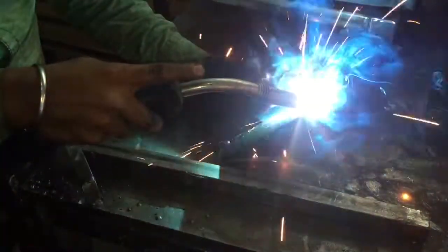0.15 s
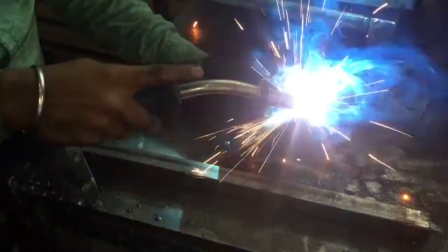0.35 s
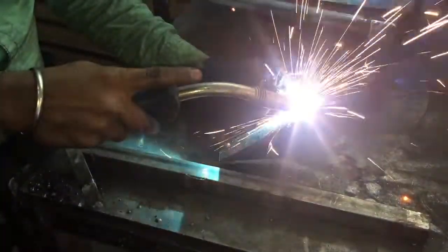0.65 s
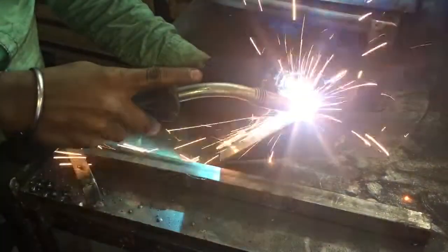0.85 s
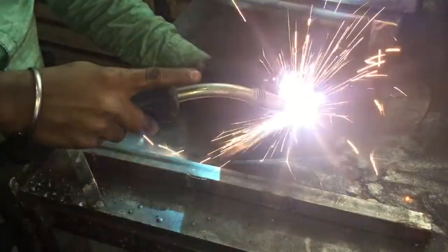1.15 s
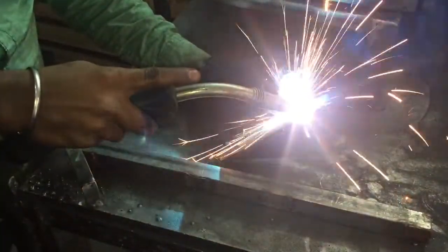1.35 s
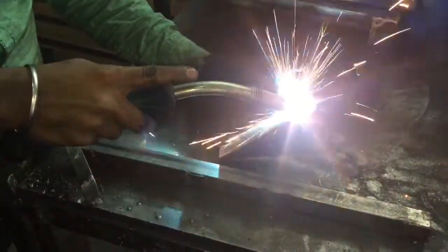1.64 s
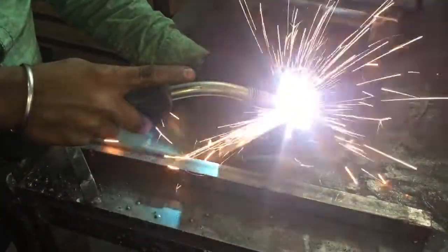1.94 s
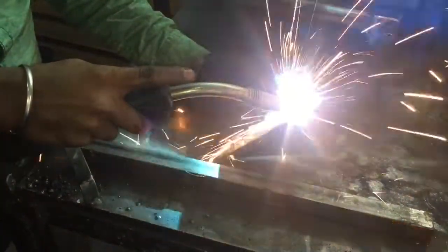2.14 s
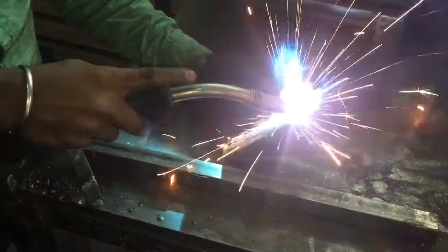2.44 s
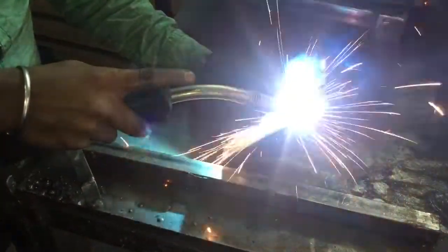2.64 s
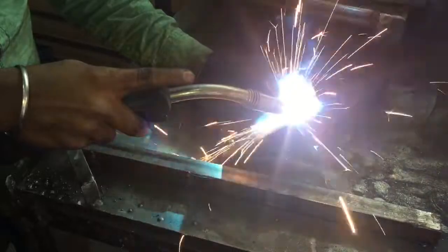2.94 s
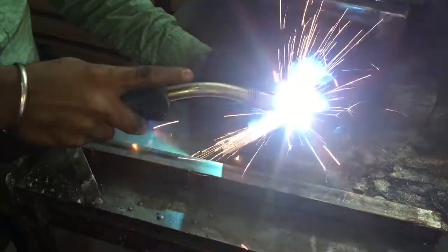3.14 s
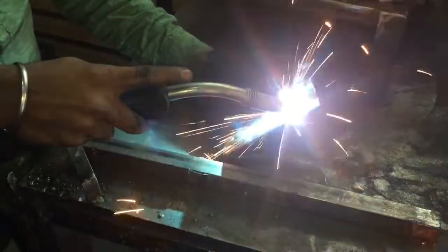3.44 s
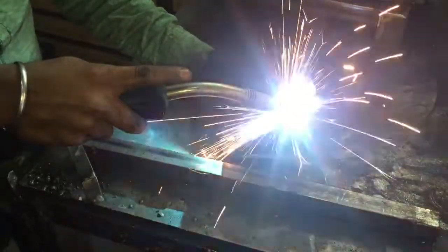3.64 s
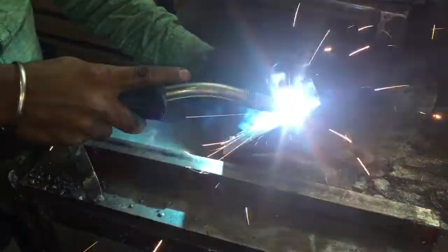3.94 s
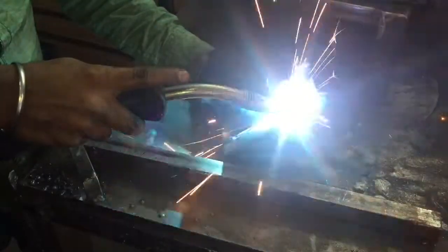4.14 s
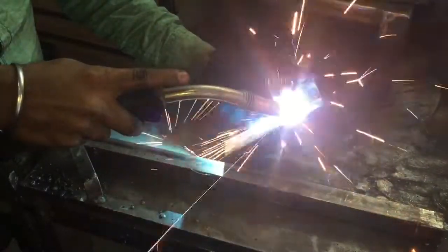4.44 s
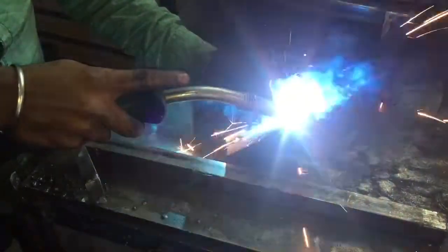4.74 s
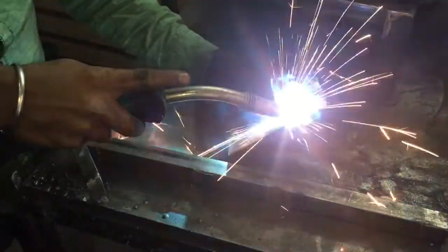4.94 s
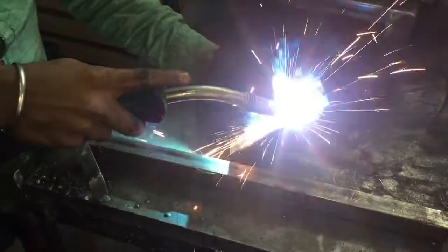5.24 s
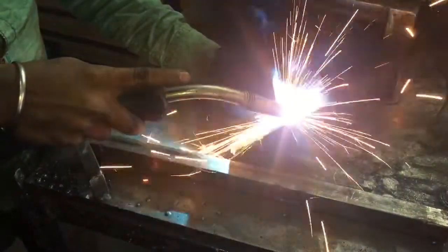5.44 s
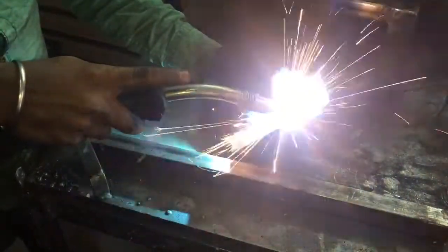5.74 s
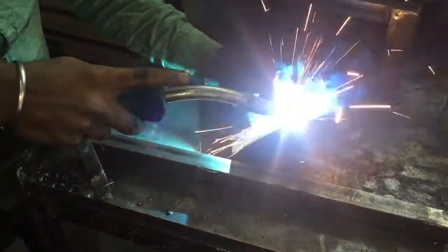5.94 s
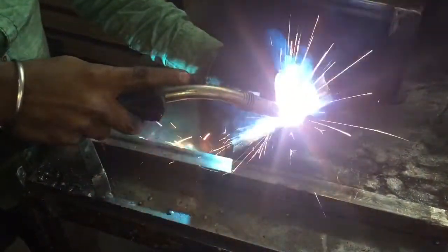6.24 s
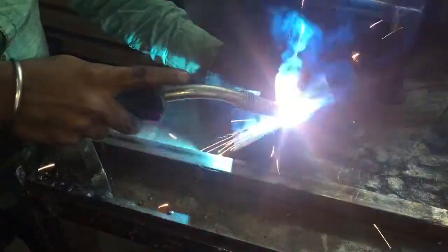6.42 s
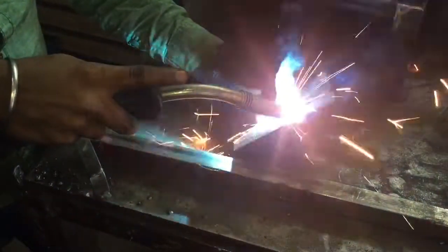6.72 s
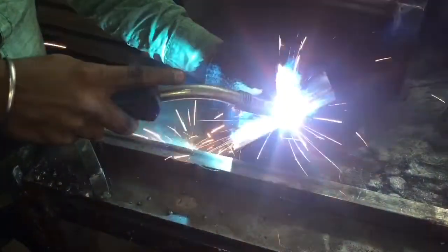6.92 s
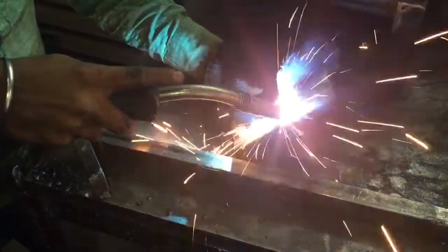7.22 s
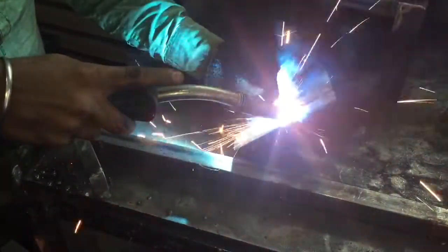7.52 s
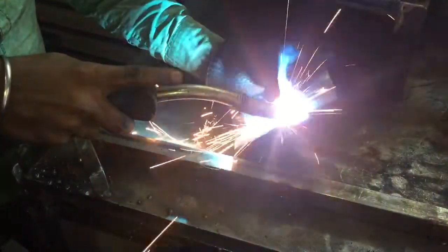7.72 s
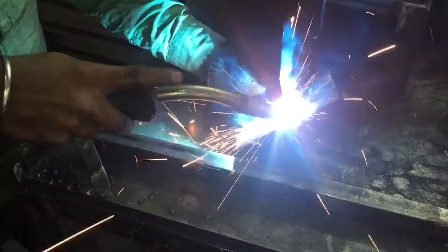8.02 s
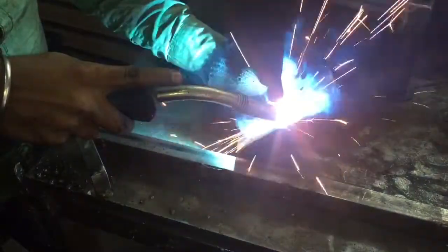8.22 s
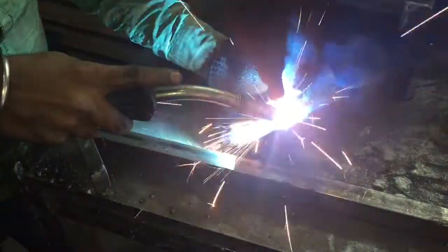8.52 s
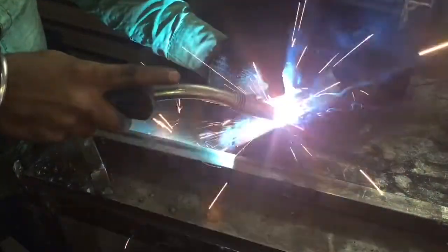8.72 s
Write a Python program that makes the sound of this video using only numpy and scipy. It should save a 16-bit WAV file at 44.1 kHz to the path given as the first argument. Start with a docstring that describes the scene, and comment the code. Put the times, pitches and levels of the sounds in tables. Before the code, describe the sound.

Close, harsh welding sizzle buzzes unevenly over rumbling steel, broken by clusters of deep distorted thumps and bright metallic spatter cracks.

```python
"""A ragged, sizzling crackle, some 120 short circuits a second, with louder spits and heavy thumps.
A wire-feed welding torch runs a seam on steel in a workshop, an arm's length from a phone's microphone.
Each short is a pair of noise bursts over a sizzle of fine spatter; the corner of the workpiece colours it,
the steel rumbles and a low hum wavers beneath. Jolts of the stumbling arc thump the microphone into
overload, and the crackle sags for a moment after each volley."""
import sys
import numpy as np
from scipy import signal
from scipy.fft import rfft, irfft, next_fast_len
from scipy.io import wavfile
from scipy.ndimage import uniform_filter1d

SR = 44100
rng = np.random.default_rng(int(sys.argv[2]) if len(sys.argv) > 2 else 0)


def transcribe(u):
    """Save the signal u as a 16-bit wav file named by the first command-line argument.

    u: samples, shape (n,) or (channels, n), limited to [-1, 1]; the rate is SR.
    q: integer samples, one column per channel.
    """
    v = np.clip(np.atleast_2d(u).T, -1, 1)
    q = np.round(v * 32767).astype(np.int16)
    wavfile.write(sys.argv[1], SR, q)


N = 391166

# how strongly the arc burns while nothing upsets it: (time [s], relative level [dB])
ARC_STRENGTH = [(0.0, -29.5), (0.69, -24), (1.15, -25), (1.58, -29.5), (1.83, -24.5), (2.38, -23.5),
                (2.59, -27), (3.17, -27.0), (3.44, -28.5), (3.71, -26), (4.21, -27), (4.71, -23),
                (4.92, -31.5), (5.06, -24), (5.86, -21.5), (7.49, -27.5), (7.8, -23.5), (8.87, -23.5)]
# brief dips of the arc: (time at the deepest [s], half length [s])
ARC_DIPS = [(0.277, 0.024), (3.429, 0.029), (3.889, 0.0052), (3.974, 0.024), (4.213, 0.024),
            (4.797, 0.0081), (5.374, 0.016), (7.034, 0.04), (7.334, .03), (7.615, 0.027), (8.107, 0.018)]
# low wavering hum: (time [s], pitch [Hz], level against the crackle before the mix [dB])
HUM_TRACK = [(0, 162.4, -23.5), (4.3, 157, -24), (4.65, 181, -12), (5.0, 174.8, -20), (5.25, 158.4, -10.5),
             (5.6, 172.2, -12), (5.85, 141, -11), (6.2, 149.5, -9), (7.7, 150, -22.5), (8.45, 175.6, -7.5),
             (8.65, 210.6, -8)]
# loud jolts of the stumbling arc: (time [s], signed relative height of the step [-])
JOLT_STEPS = [(0.0793, 1.86), (0.1335, -2.44), (0.1612, 1.13), (0.1816, 0.61), (0.2116, -0.85),
              (0.2163, -2.21), (0.2391, 0.68), (0.5187, -0.3), (0.7443, 3.18), (0.7546, -5.3), (0.784, 0.5),
              (0.8756, -0.85), (1.0548, 1.04), (1.1136, -1.16), (1.1358, -0.65), (1.2199, 0.79),
              (1.2544, 6.53), (1.2738, -2.1), (1.2905, 2.29), (1.4548, -0.27), (1.8107, 2.61),
              (1.834, -1.92), (1.8803, 2.8), (1.8925, -2.08), (1.9442, -0.98), (1.9743, 1.27),
              (2.0221, -0.49), (2.3632, 3.11), (2.3857, -3.4), (2.4009, 4.42), (2.4075, -1.25),
              (2.4212, -3.01), (2.4653, 1.77), (2.4841, -1.03), (2.5897, 2.92), (2.6139, -0.74),
              (2.6913, 2.31), (2.7003, -1.21), (2.7107, -1.81), (3.0982, -2.39), (3.1206, 0.91),
              (3.1349, 1.2), (3.1749, -3.04), (3.192, 2.75), (3.2993, -3.02), (3.3211, 1.39),
              (3.3677, -0.45), (3.9036, 4.09), (3.9241, -1.2), (3.928, -3.71), (3.9452, 2.22),
              (3.9568, 1.09), (3.9936, -0.61), (4.0064, -3.24), (4.0415, 0.37), (4.231, -1.25),
              (4.2959, 0.33), (4.8127, 5.91), (4.8161, 1.12), (6.018, 3.8), (6.0637, -2.93),
              (6.0712, -4.68), (6.0996, 0.9), (6.2061, 1.83), (6.2229, -0.81), (6.2649, -0.82),
              (6.3135, -1.32), (6.3937, 1.31), (6.4166, 4.02), (6.5207, -1.71), (6.5682, 0.89),
              (6.6381, 4.85), (6.6681, -0.73), (6.7999, 4.95), (6.8272, -0.92), (6.8782, 2.43),
              (6.9022, -2.69), (6.9368, 1.15), (6.9845, -1.08), (7.209, 4.37), (7.2174, -1.53),
              (7.2215, -2.04), (7.3938, 0.73), (7.4317, -0.9), (7.5694, 0.4), (7.8244, -0.82),
              (7.886, 1.76), (7.9549, -1.22), (7.9569, -3.25), (7.9851, 2.02), (8.0285, 1.03),
              (8.0659, -0.45), (8.152, -0.5), (8.763, 7.34), (8.7663, 2.39), (8.7747, -4.53),
              (8.8243, -2.6), (8.8475, 1.26), (8.8601, 1.1)]
# loudest spits of bursting metal: (time [s], level before the mix [dB])
LOUD_SPITS = [(2.336, -16), (2.351, -15), (3.0937, -9), (3.5952, -13.5), (3.6814, -8.5), (3.8542, -7),
              (3.8625, -8), (4.733, -11), (5.032, -4.5), (5.2652, -9), (5.3845, -6.5), (5.414, -3),
              (5.4723, -19), (5.7676, 0), (5.7955, -5.5), (6.306, 1), (7.1744, -10.5), (7.659, -15),
              (7.7333, -8), (7.8123, -10), (8.3619, -6), (8.4031, -1), (8.4336, -4.5), (8.514, -2),
              (8.5741, -1.5), (8.6225, -3)]
# standing waves between torch and steel, which swell and wane as the torch moves along the joint:
# (centre [Hz], width [Hz], strongest level [dB], time when strongest [s], depth of wane [dB],
#  swell to swell [s])
CORNER_WAVES = [(663, 312, 2.5, 8.2, 2, 14.4), (1410, 770, 1.4, 7.5, 4.5, 15),
                (2300, 640, 1.4, 5.9, 4.5, 8.4), (3224, 950, 3.5, 7.3, 4.5, 17.5),
                (3680, 344, 8.5, 5.2, 3.5, 11), (4260, 260, -3, 5.1, 4.5, 4.9),
                (5337, 670, 4, 1.6, 11, 3.2), (6034, 520, 9, 5.73, 11.5, 13.5),
                (7370, 1300, -0.5, 6.53, 9, 7.2), (8570, 830, 8, 1.35, 9, 9.2),
                (9340, 810, 5.5, 4.04, 6, 6), (11600, 1100, 5, 2.2, 17.5, 13.5),
                (11780, 1100, 6, 7.5, 36, 15.5), (14340, 2500, 5.5, 6.7, 1.5, 9.1),
                (14800, 1200, -2, 2.5, 28, 7.5), (15300, 930, -14, 0.2, 10, 2.1)]
# where the phone's sound path turns the phase: (frequency [Hz])
PHASE_TURNS_HZ = [57, 501, 6440]

DIP_DB = -6.5  # at the bottom of a dip
# a jolt knocks the arc back: loss per unit of jolt height, time to falter, time to recover
LOSS_DB, FALTER_S, RECOVER_S = 0.63, .015, .24
SHORT_RATE, SHORT_SPREAD = 120, .36  # short circuits a second; log spread of their spacing
SPATTER_RATE = 900  # fine droplets a second
# kicks after jolts: chance for each jolt, typical delay, typical height after a jolt of 1 or more
KICK_CHANCE, KICK_DELAY_S, KICK_HEIGHT = .4, .016, 0.24
# lesser spits: how many a second, weakest level against the arc before the mix, range above it
SPIT_RATE, SPIT_WEAKEST_DB, SPIT_RANGE_DB = 5.6, 12, 6
TOP_HZ = 15900  # upper limit of the phone


def undb(db):
    """Decibels to gain."""
    return 10 ** (np.asarray(db) / 20)


def curve(rows):
    """A control joined by straight lines, one value a sample."""
    return np.interp(np.arange(N) / SR, *np.transpose(rows))


def impulses(times, sizes):
    """One spike of the given size at each time."""
    at = np.round(times * SR).astype(int)
    inside = (at >= 0) & (at < N)
    return np.bincount(at[inside], sizes[inside], N)


def fade(x, decay_s):
    """Every spike of x dies away exponentially."""
    return signal.lfilter([1], [1, -np.exp(-1 / (decay_s * SR))], x + 1e-18)


def filtered(x, response):
    """Pass x through a response given as a function of s = j Hz."""
    size = next_fast_len(N + SR, real=True)
    s = 1j * np.arange(size // 2 + 1) * SR / size
    return irfft(rfft(x, size) * response(s), size)[:N]


def ring(x, hz, width_hz):
    """One resonance, gain 1 at its centre."""
    return filtered(x, lambda s: width_hz * s / (s ** 2 + width_hz * s + hz ** 2))


def steady(x, span_s):
    """Bring the running rms of x to 1."""
    return x / np.sqrt(uniform_filter1d(x ** 2, int(span_s * SR)) + 1e-12)


def bursts(times, sizes, decay_s, tail_s, tail_db, click_db):
    """Tiny explosions: a click, a puff of noise, and a weaker fizz with its own decay."""
    power = impulses(times, sizes ** 2)
    puff = fade(power, decay_s / 2)  # power dies twice as fast as amplitude
    fizz = undb(tail_db) ** 2 * fade(power, tail_s / 2)
    envelope = np.sqrt(puff + fizz)
    # at 0 dB the click is as strong as its puff
    click = undb(click_db) * np.sqrt(decay_s * SR / 2) * impulses(times, sizes)
    return click + envelope * rng.standard_normal(N)


def burn_db():
    """Strength of the arc: each jolt unsettles it, so it sags after a volley and then builds up again."""
    times, heights = np.transpose(JOLT_STEPS)
    t = np.arange(N) / SR
    since_jolt = t - np.r_[0, times][np.searchsorted(times, t)]
    upset = fade(impulses(times, np.abs(heights)), RECOVER_S)
    sag = LOSS_DB * upset * (1 - np.exp(-since_jolt / FALTER_S))
    dips = sum(np.exp(-((t - s) / half_s) ** 2) for s, half_s in ARC_DIPS)
    return curve(ARC_STRENGTH) - sag + DIP_DB * dips


def waver(depth_db, hz, width_hz):
    """The arc never burns quite evenly: its strength flutters at a loose rate."""
    flutter = ring(rng.standard_normal(N), hz, width_hz)
    return undb(depth_db * flutter / flutter.std())


def shorts(heat_db, scatter_db, length_s, stretch, count=2):
    """The wire touches the pool and blows free again: two quick cracks, uneven in spacing and force."""
    chance = rng.standard_normal((int(2 * SHORT_RATE * N / SR), 3 + count))
    spacings = np.exp(SHORT_SPREAD * chance[:, 0] - SHORT_SPREAD ** 2 / 2) / SHORT_RATE
    starts = np.cumsum(spacings)
    # a hotter arc takes longer to blow free
    relative_heat_db = np.interp(starts, np.arange(N) / SR, heat_db - heat_db.mean())
    lengths = length_s * undb(stretch * relative_heat_db) * np.exp(.7 * chance[:, 1])
    times = starts[:, None] + lengths[:, None] * np.linspace(0, 1, count)
    short_db = scatter_db * np.minimum(chance[:, 2:3], 1.6)
    crack_db = 3.2 * np.minimum(chance[:, 3:], 1.3)
    sizes = undb(short_db + crack_db)
    cracks = bursts(times.ravel(), sizes.ravel(), decay_s=.0005, tail_s=.003, tail_db=-14, click_db=0)
    return steady(cracks, span_s=0.098)


def spatter(scatter_db):
    """Fine droplets sizzle among the snaps, each a tiny burst at a random time."""
    count = int(SPATTER_RATE * N / SR)
    times = rng.uniform(0, N / SR, count)
    sizes = undb(scatter_db * rng.standard_normal(count))
    sizzle = bursts(times, sizes, decay_s=0.0012, tail_s=0.0011, tail_db=-10.0, click_db=-10)
    return steady(sizzle, span_s=0.62)


def hum(flutter_s):
    """A low tone that wanders in pitch and flutters in strength."""
    s, hz, db = np.transpose(HUM_TRACK)
    phase = 2 * np.pi * np.cumsum(curve(np.c_[s, hz])) / SR
    flutter = fade(fade(rng.standard_normal((2, N)), flutter_s), flutter_s)
    tone = flutter[0] * np.cos(phase) + flutter[1] * np.sin(phase)
    return undb(curve(np.c_[s, db])) * steady(tone, span_s=0.12)


def steel(crackle):
    """The crackle shakes the steel: a dull rumble and one narrow note, stronger when the hum is."""
    evenness = undb(curve(np.array(HUM_TRACK)[:, ::2]) / 2)  # half the hum's swing in dB
    rumble = undb(6.0) * ring(crackle, hz=176, width_hz=385)
    note = undb(15.5) * ring(crackle, hz=345, width_hz=4.5)
    return evenness * (rumble + note)


def tremors(rate):
    """Tiny jolts of either sign come at random times, rate of them a second."""
    count = int(rate * N / SR)
    return impulses(rng.uniform(0, N / SR, count), rng.laplace(size=count))


def jolts():
    """Times and heights of the loud jolts and of the weaker kicks that trail some of them."""
    times, heights = np.transpose(JOLT_STEPS)
    luck, delay, size, sign = rng.uniform(size=(len(times), 4)).T
    kick_times = times + KICK_DELAY_S * 2 ** (2 * delay - 1)
    kick_sizes = KICK_HEIGHT * np.minimum(np.abs(heights), 1) * (.5 + size)
    kicks = (luck < KICK_CHANCE) * kick_sizes * np.sign(sign - .5)
    return np.r_[times, kick_times], np.r_[heights, kicks]


def thumps(steps, leak_hz, low_cut_hz, damping):
    """Each jolt is a step at the microphone. It leaks away, and its lows come late: a falling 'tew'."""
    def response(s):
        step = SR / (2 * np.pi) / (s + leak_hz)
        cuts = [s ** 2 / (s ** 2 + damping * hz * s + hz ** 2) for hz in low_cut_hz]
        # all-pass: turns the phase, keeps the level
        turns = [(s ** 2 - np.sqrt(2) * hz * s + hz ** 2) / (s ** 2 + np.sqrt(2) * hz * s + hz ** 2)
                 for hz in PHASE_TURNS_HZ]
        return step * np.prod(cuts + turns, axis=0)
    return filtered(steps, response)


def spits(burn, jolt_times, jolt_heights, jolt_db):
    """Larger drops burst with a crack, the lesser ones by chance and with the arc; jolts crack too."""
    loud_times, loud_db = np.transpose(LOUD_SPITS)
    place, force = rng.uniform(size=(int(SPIT_RATE * N / SR), 2)).T
    lesser = burn[(place * N).astype(int)] * undb(SPIT_WEAKEST_DB + SPIT_RANGE_DB * force)
    jolt_sizes = undb(jolt_db) * np.minimum(np.abs(jolt_heights), 1)
    times = np.r_[loud_times, place * N / SR, jolt_times]
    sizes = np.r_[undb(loud_db), lesser, jolt_sizes]
    return bursts(times, sizes, decay_s=0.00046, tail_s=0.0011, tail_db=-12.5, click_db=-8)


def corner_response(s, valley_db, size=1024):
    """Causal ring of the corner with the torch where it is at time s."""
    hz = np.arange(size // 2 + 1) * SR / size
    centre, width, db, strongest_s, wane_db, period_s = np.transpose(CORNER_WAVES)[:, :, None]
    peaks = undb(db - wane_db * np.sin(np.pi * (s - strongest_s) / period_s) ** 2)
    resonances = peaks / (1 + (2 * (hz - centre) / width) ** 2)
    power = undb(valley_db) ** 2 + np.sum(resonances ** 2, axis=0)
    # fold the cepstrum forward in time: minimum phase
    cepstrum = irfft(np.log(power) / 2)
    cepstrum[1:size // 2] *= 2
    cepstrum[size // 2 + 1:] = 0
    return irfft(np.exp(rfft(cepstrum)))


def corner(x, count=12):
    """Standing waves in the corner colour x, gliding from one place on the joint to the next."""
    places = np.linspace(0, N / SR, count)
    coloured = np.zeros(N)
    for s, weight in zip(places, np.eye(count)):
        share = curve(np.c_[places, weight])  # crossfade between neighbouring places
        coloured += signal.oaconvolve(x * share, corner_response(s, valley_db=-42.0))[:N]
    return coloured


def workshop(x, t60_s, wet_db):
    """A faint tail of decaying noise from the bench and the walls."""
    t = np.arange(SR // 2) / SR
    tail = rng.standard_normal(len(t)) * np.exp(-np.log(1000) * t / t60_s) * (t > .003)
    return x + undb(wet_db) * signal.oaconvolve(x, tail / np.linalg.norm(tail))[:N]


def scene():
    """Crackle and spits ring in corner and room, crackle in the steel; jolts strike the microphone directly."""
    heat_db = burn_db()
    burn = undb(heat_db) * waver(depth_db=1.65, hz=61.5, width_hz=20)
    jolt_times, jolt_heights = jolts()

    snaps = undb(4.0) * shorts(heat_db, scatter_db=1.17, length_s=.0006, stretch=.9)
    sizzle = undb(-2.5) * spatter(scatter_db=4.5)
    crackle = burn * (snaps + sizzle)
    cracks = undb(6.5) * spits(burn, jolt_times, jolt_heights, jolt_db=-15.5)
    arc = corner(crackle + cracks) + steel(crackle) + undb(-1) * burn * hum(flutter_s=0.007)
    # the small microphone drops the deep bass of the arc
    arc = signal.sosfilt(signal.butter(2, 70, "high", fs=SR, output="sos"), arc)

    big_steps = undb(-0.76) * impulses(jolt_times, jolt_heights)
    tiny_steps = undb(-7.5) * burn * tremors(rate=45)
    pops = thumps(big_steps + tiny_steps, leak_hz=54, low_cut_hz=[58, 35], damping=1.27)
    pops = pops + undb(-12) * ring(pops, hz=620, width_hz=250)  # a slight honk in the middle
    return (workshop(arc, t60_s=0.12, wet_db=-11.0) + pops)[None]


def record(dry):
    """The phone flattens everything near full scale and cuts the top."""
    squashed = dry / (1 + dry ** 4) ** (1 / 4)
    return signal.sosfilt(signal.ellip(10, .1, 70, TOP_HZ, fs=SR, output="sos"), squashed)


dry = scene()
out = record(dry)
transcribe(out)
```